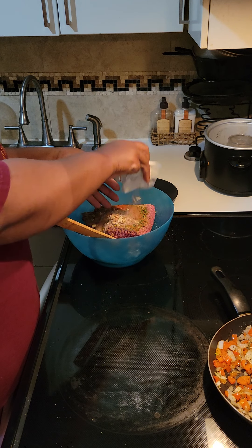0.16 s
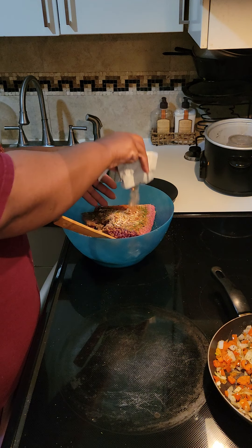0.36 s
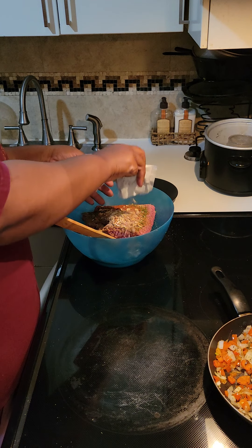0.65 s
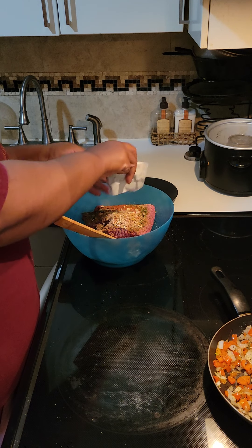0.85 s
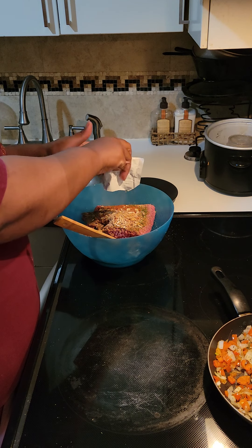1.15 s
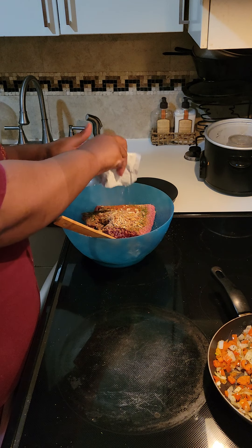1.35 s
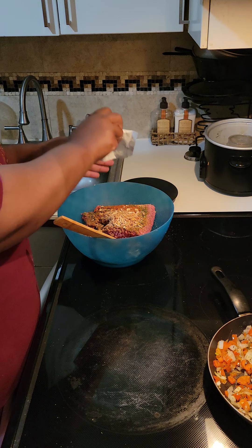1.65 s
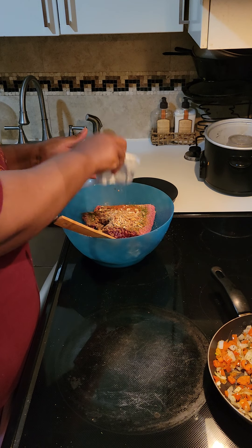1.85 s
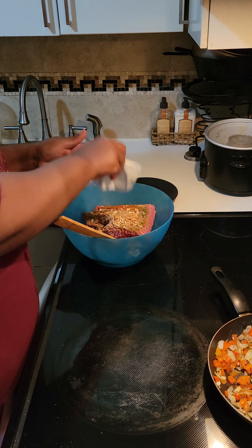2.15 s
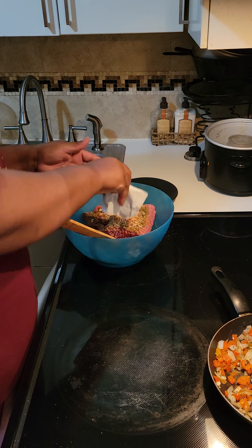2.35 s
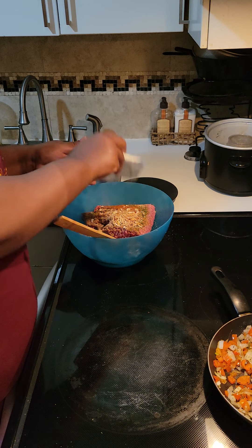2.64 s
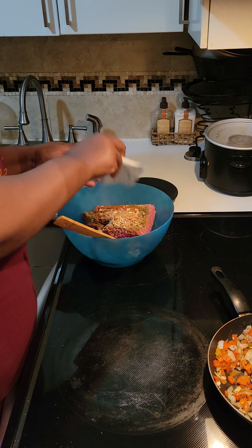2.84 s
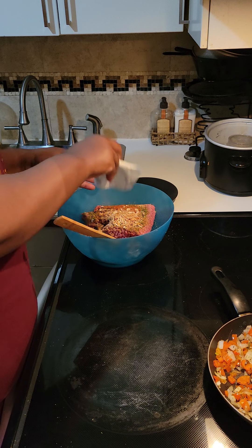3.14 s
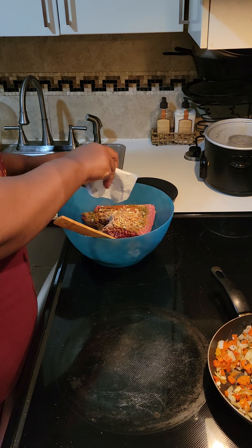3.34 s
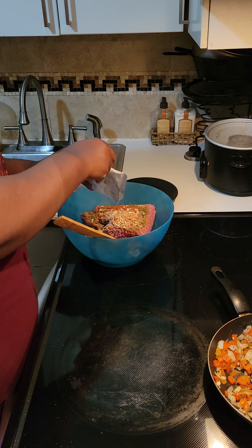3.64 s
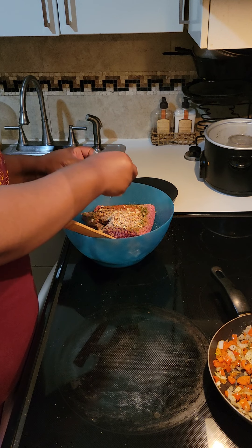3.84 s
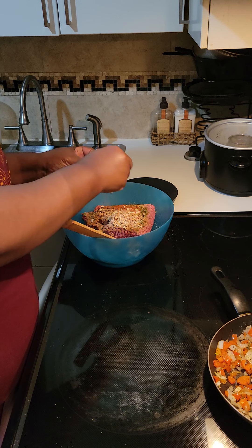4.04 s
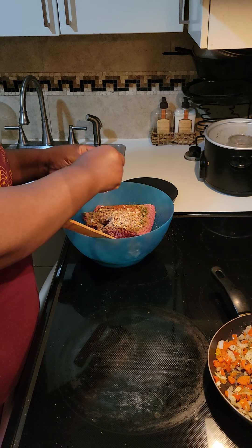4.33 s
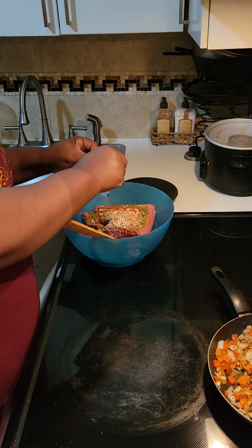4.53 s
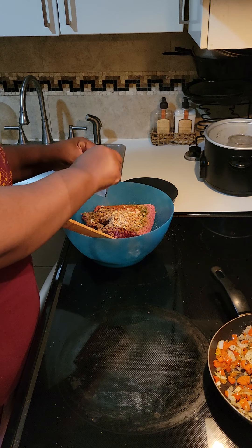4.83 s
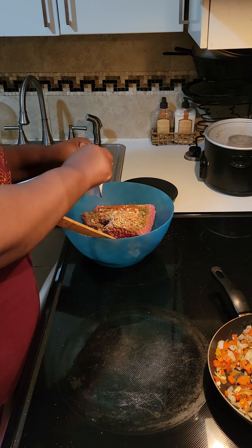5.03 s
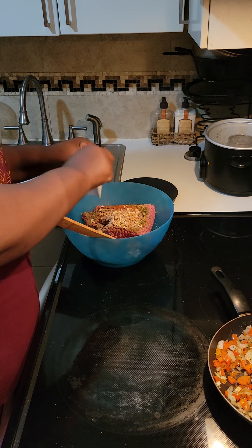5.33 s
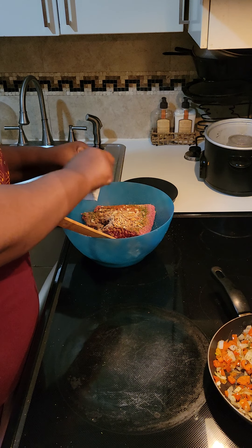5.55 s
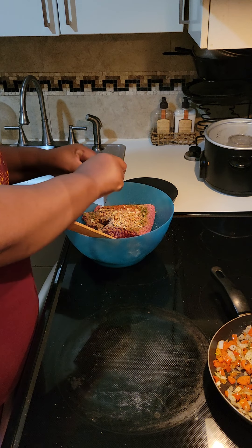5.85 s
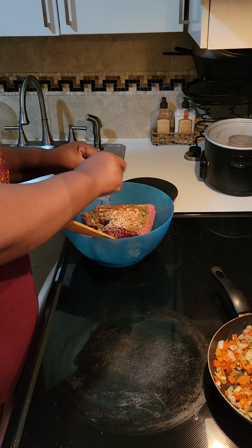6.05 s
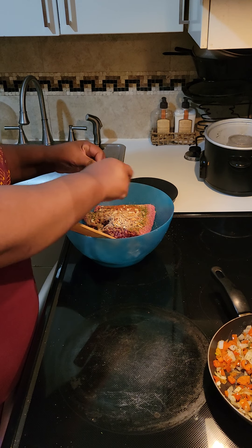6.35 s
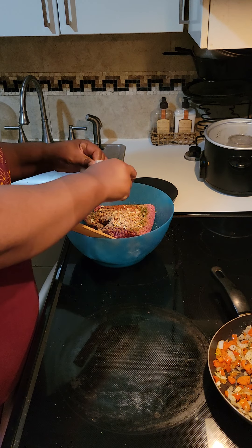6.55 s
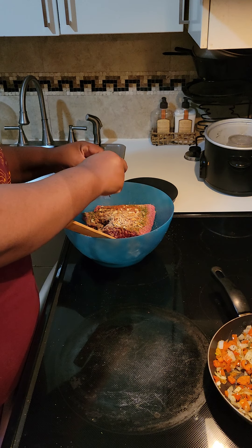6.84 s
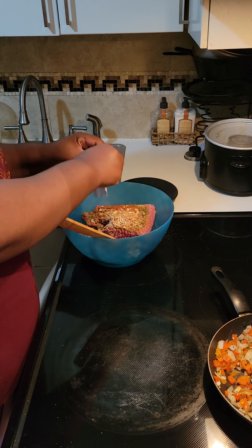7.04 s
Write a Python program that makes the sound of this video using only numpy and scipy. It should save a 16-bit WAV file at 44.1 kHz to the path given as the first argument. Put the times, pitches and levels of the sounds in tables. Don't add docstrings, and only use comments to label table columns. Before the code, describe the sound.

Close, dry paper crinkling: uneven shakes with fine grains sliding, a sparse lull, then denser snapping and crushing over a faint refrigerator hum.

```python
import sys
import numpy as np
from scipy import signal
from scipy.fft import rfft, irfft, next_fast_len
from scipy.io import wavfile

SR = 44100
rng = np.random.default_rng(int(sys.argv[2]) if len(sys.argv) > 2 else 0)


def master_out(mix):
    frames = np.transpose(np.atleast_2d(mix))
    ceiling = np.clip(frames, -1, 1)
    pcm = np.round(ceiling * 32767).astype(np.int16)
    wavfile.write(sys.argv[1], SR, pcm)


def natural_amplitude(level_db):
    exponent = np.asarray(level_db, float) / 20
    return 10 ** exponent


N = 316990
SIZE = next_fast_len(N + SR // 2)
TIME = np.arange(N) / SR


def bins(size):
    return np.maximum(np.arange(size // 2 + 1) * SR / size, 1)


HZ = bins(SIZE)


def at_hz(points, hz=HZ):
    point_hz, value = np.array(points).T
    return np.interp(np.log(hz), np.log(point_hz), value)


def in_time(rows):
    s, *columns = np.transpose(rows)
    return [np.interp(TIME, s, column) for column in columns]


def rms_one(x):
    return x / np.sqrt(np.mean(x ** 2) + 1e-20)


def drift(rate_hz):
    r = np.exp(-20 * np.pi * rate_hz / SR)
    noise = rng.standard_normal(N // 10 + 3002)
    slow = signal.lfilter([1], [1, -2 * r, r * r], noise)[3000:]
    return np.interp(np.arange(N) / 10, np.arange(len(slow)), rms_one(slow))


def resonance(x, hz, cycles):
    r = natural_amplitude(-60 * hz / cycles / SR)
    zeros = [(1 - r * r) / 2, 0, (r * r - 1) / 2]
    poles = [1, -2 * r * np.cos(2 * np.pi * hz / SR), r * r]
    return signal.lfilter(zeros, poles, x + 1e-18)


# pitch_hz, likeness (1 same, -1 opposite)
PORT_LIKENESS = [(60, .985), (120, .9), (200, .78), (330, .45), (640, -.3), (1400, -.3), (5000, -.12),
                 (15000, 0.0)]


def diffuse_pair(size):
    mid, side = rfft(rng.standard_normal((2, size)))
    alike = np.clip(at_hz(PORT_LIKENESS, bins(size)), -1, 1)
    return (np.sqrt(1 + alike) * mid + np.sqrt(1 - alike) * side * [[1], [-1]]) / np.sqrt(2)


# pitch_hz, level_db (per Hz)
AIR_COLOUR = [(20, -12), (45, -19), (68, -7), (85, -13), (110, -16), (172, -25), (300, -12.5), (420, -20.5),
              (960, -24), (1680, -25), (2100, -31.5), (3600, -25.5), (4400, -36.5), (15600, -41)]


def room_air():
    hush = irfft(diffuse_pair(SIZE) * natural_amplitude(at_hz(AIR_COLOUR)) * (HZ > 15), SIZE)[:, :N]
    return natural_amplitude(-59.0) * rms_one(hush)


# pitch_hz, start_rad
HUM_LINES = [(56.543, .27), (141.5, 0.0), (212.0, 0.0)]
HUM_LEVEL_DB = [-50.5, -78, -84]
# start_s, level_db (rms)
FAR_MOTOR = [
    (0, -106),
    (5.6, -95),
    (5.8, -67),
    (6.8, -62),
    (7.0, -90),
    (7.19, -95),
]


def refrigerator():
    apart = np.array([[.065], [-.065]])
    lines = 0
    for (hz, phase), db in zip(HUM_LINES, HUM_LEVEL_DB):
        wavering = natural_amplitude(db + 0.35 * drift(3.3))
        lines = lines + wavering * np.sin(2 * np.pi * hz * TIME + phase + apart)
    motor = natural_amplitude(in_time(FAR_MOTOR)[0]) * np.sin(2 * np.pi * 71.3 * TIME)
    return np.sqrt(2) * (lines + motor)


# start_s, level_db (peak), pitch_hz (of the push)
FINGER_PATS = [(1.076, -34, 341.5), (1.292, -37, 322), (1.296, -51, 150), (3.389, -57, 140),
               (5.301, -38, 400), (5.303, -40, 720), (5.413, -43, 700), (5.68, -46, 640),
               (5.679, -52, 91.5), (6.571, -42, 262), (7.033, -47, 93), (7.036, -50, 190), (7.04, -44, 520),
               (6.58, -41, 480), (7.169, -63, 91.5)]


def pats():
    out, after = np.zeros(N + SR), np.arange(SR // 2) / SR
    for s, db, hz in FINGER_PATS:
        cycles = after * hz
        shape = natural_amplitude(db - 1.0 - 60 * cycles / 28.0) * (1 - np.exp(-cycles / 0.17))
        start = round(s * SR)
        out[start:start + len(after)] += shape * np.sin(2 * np.pi * cycles)
    return out[:N]


# pitch_hz, t60_s
KITCHEN_DECAY = [(100, 0.16), (500, 0.17), (2000, 0.1), (6000, 0.12), (15000, 0.067)]


def kitchen(early_db, wet_db):
    size, kept = 2 ** 15, SR // 3
    after = np.arange(size) / SR
    noise, scatter = (irfft(diffuse_pair(size)) for part in range(2))
    tail = 0
    for k, (_, t60) in enumerate(KITCHEN_DECAY):
        only_this = [(hz, float(j == k)) for j, (hz, _) in enumerate(KITCHEN_DECAY)]
        dying = noise * natural_amplitude(-60 * after / t60) * np.clip(after / 0.0037, 0, 1)
        tail = tail + at_hz(only_this, bins(size)) * rfft(dying)
    tail = irfft(tail)[:, :kept]
    early = scatter[:, :kept] * natural_amplitude(-60 * after[:kept] / 0.013)
    tail, early = (x / np.sqrt(np.sum(x ** 2) / 2) for x in (tail, early))
    return rfft(natural_amplitude(early_db) * early + natural_amplitude(wet_db) * tail, SIZE)


# pitch_hz, lead_rad (left ahead)
LEFT_LEAD = [(60, -2.5), (400, -.5), (900, 3.1), (1400, 3.0), (1850, 1.44), (3000, 2.5), (4300, 2),
             (15000, 8)]


def direct(lag_s):
    return np.exp(.5j * (at_hz(LEFT_LEAD) + 2 * np.pi * HZ * lag_s) * [[1], [-1]])


# pitch_hz, level_db (per Hz)
PAPER_COLOUR = [(150, -50), (250, -14.5), (500, -7.5), (900, -8), (1250, -3.5), (1600, -4), (2050, -3),
                (3200, 0.5), (4500, -8.5), (7400, -14), (8700, -12), (10600, -15.5), (13000, -10.5),
                (15600, -17.5)]
COLOUR_BORDERS_HZ = [740, 2040, 4640, 7400]


def paper_voice(trains):
    below = [0] + [1 / (1 + (HZ / hz) ** 8) for hz in COLOUR_BORDERS_HZ] + [1]
    spectrum = 0
    for train, low, high in zip(trains, below, below[1:]):
        part = natural_amplitude(at_hz(PAPER_COLOUR)) * (high - low)
        spectrum = spectrum + rfft(train, SIZE) * part / np.sqrt(np.mean(part ** 2))
    return irfft(spectrum, SIZE)[:N]


def buckles(per_s, spread_db, clump_db, cycles):
    sizes = natural_amplitude(spread_db * np.minimum(rng.exponential(1, N), 3.0)) * rng.choice([-1, 1], N)
    clicks = sizes * (rng.random(N) < per_s * natural_amplitude(clump_db * drift(60)) / SR)
    facet = rng.integers(0, 14, N)
    facet_hz = np.geomspace(300, 16000, 14)
    return rms_one(sum(resonance(clicks * (facet == k), hz, cycles) for k, hz in enumerate(facet_hz)))


# start_s, level_db (rustle), brightness_db
STEADY_GRIP = [(0.0, -54.1, -1.0), (0.19, -59, 6.2), (0.32, -69.5, -5.5), (0.45, -65, -2.1),
               (0.91, -62.5, -3), (1.06, -71.5, 6.0), (1.22, -54, -2), (1.51, -68, -1.3),
               (1.99, -69.5, -8.5), (2.45, -64.6, -6), (3.5, -65, -1), (4.2, -63.0, 4.5), (5.3, -55, 1),
               (6.08, -52, 1.5), (6.3, -57.5, -0.3), (6.41, -69, 4.1), (6.8, -62.5, -3), (7.0, -80, 4.0)]
GRIP_COLOUR_DB = [-7, 3, 0.5, -3.5, -0.3]
GRIP_BRIGHTENING = [-0.37, -0.98, 0.24, .45, .65]
# crest_s, level_db, swell_s,
# fade_s, brightness_db
SHAKES_AND_SQUEEZES = [(0.097, -44.5, 0.17, 0.1, 4), (0.213, -48.5, 0.045, 0.03, 9),
                       (0.369, -45.5, 0.063, 0.173, -1.5), (0.507, -42, 0.025, 0.18, 2.5),
                       (0.59, -37.5, 0.13, 0.035, -2.0), (0.733, -45.9, 0.019, 0.29, 1.5),
                       (0.913, -56.5, 0.075, 0.074, -6.3), (1.088, -32.5, 0.016, 0.08, -4),
                       (1.258, -52, 0.154, 0.02, 5.8), (1.335, -44, 0.07, 0.07, -3),
                       (1.594, -56.8, 0.055, 0.046, 2), (1.719, -52, 0.039, 0.061, -1.8),
                       (1.844, -35.5, 0.08, 0.045, -2), (1.975, -56.3, 0.037, 0.049, -12),
                       (2.12, -51.9, 0.187, 0.172, 6), (2.386, -51, 0.16, 0.087, 8), (2.528, -52, 0.028, 0.052, 4),
                       (2.612, -54.4, 0.11, 0.145, 6.4), (2.862, -44.7, 0.15, 0.072, 3.7),
                       (3.06, -45.5, 0.189, 0.16, 6), (3.276, -48.5, 0.17, 0.29, -2),
                       (3.407, -37.5, 0.036, 0.071, -5.5), (3.687, -49, 0.17, 0.068, -3.1),
                       (3.871, -53.5, 0.15, 0.26, 3),
                       (4.009, -50, 0.228, 0.027, -3), (4.095, -55.5, 0.027, 0.16, -2),
                (4.251, -49, 0.12, 0.21, -1.9), (4.407, -39.5, 0.013, 0.093, -1.5),
                (4.564, -45.0, 0.027, 0.075, 5.9), (4.625, -49.3, 0.22, 0.084, -8.6),
                (4.768, -46, 0.048, 0.25, -2.5), (4.893, -36.9, 0.05, 0.11, 4.5),
                (5.097, -37.1, 0.09, 0.15, 13.5), (5.28, -46, 0.1, 0.04, 4), (5.314, -29.5, 0.02, 0.08, 1),
                (5.415, -34.5, 0.013, 0.06, -4), (5.534, -44.2, 0.019, 0.086, 3.9),
                (5.615, -39.5, 0.12, 0.323, 3.7), (5.834, -41, 0.045, 0.082, 7),
                (5.879, -44, 0.016, 0.029, -1), (5.979, -40.5, 0.12, 0.13, -1),
                (6.145, -41.5, 0.142, 0.11, -1), (6.33, -46, 0.012, 0.05, 3),
                (6.498, -44.8, 0.12, 0.067, 13), (6.587, -42.5, 0.14, 0.05, -10),
                (6.75, -53, 0.071, 0.17, 15), (7.04, -38.5, 0.009, 0.059, -0.5),
                (7.184, -42, 0.041, 0.1, 5)]
CREST_COLOUR_DB = [-17, -4, 0, -8.5, -6]
CREST_BRIGHTENING = [-0.76, -0.88, 0.067, 0.25, .45]


def handling():
    level_db, bright_db = in_time(STEADY_GRIP)
    grip_db = level_db + np.array(GRIP_COLOUR_DB)[:, None] + np.outer(GRIP_BRIGHTENING, bright_db)
    power = natural_amplitude(2 * grip_db)
    for s, db, swell, fade, bright_db in SHAKES_AND_SQUEEZES:
        swell, fade = max(swell, .005), max(fade, .005)
        near = slice(max(round((s - 2 * swell) * SR), 0), round((s + 2 * fade) * SR))
        away = np.maximum((s - TIME[near]) / swell, (TIME[near] - s) / fade)
        shares_db = np.array(CREST_COLOUR_DB) + bright_db * np.array(CREST_BRIGHTENING)
        crest_db = db - 20 * away
        power[:, near] += natural_amplitude(2 * shares_db[:, None]) * natural_amplitude(2 * crest_db)
    return np.sqrt(power)


def rustle():
    paper = buckles(per_s=4000, spread_db=3.3, clump_db=4.2, cycles=5.1)
    grains = rms_one(rng.standard_normal(N) * natural_amplitude(1.2 * drift(150)))
    bright, airy = 0.95 * grains + 0.8 * paper, 1.1 * grains + 0.6 * paper
    return natural_amplitude(-3.5) * handling() * [paper, paper, paper, bright, airy]


# start_s, level_db (peak), pitch_hz
STIFF_FACETS = [(0.1053, -37, 3100), (0.3627, -39, 2580), (0.3627, -43, 3790), (0.3831, -40, 2760),
                (0.4405, -44, 3880), (0.441, -39, 2840), (0.442, -30, 1550), (0.4465, -33, 1460),
                (0.5019, -36, 1810), (0.5153, -34, 1720), (0.5682, -30, 2760), (0.5792, -33, 1810),
                (0.5877, -37, 4050), (0.5926, -34, 2580), (0.5931, -31, 1550), (0.6001, -32, 1030),
                (0.7328, -42, 3530), (0.7398, -35, 1720), (0.7478, -41, 1640), (0.8032, -41, 2930),
                (0.8166, -35, 1550), (1.0785, -37, 3450), (1.0795, -34, 1460), (1.0845, -35, 2840),
                (1.0845, -32, 3880), (1.0865, -33, 1720), (1.09, -35, 3700), (1.093, -33, 3010),
                (1.0955, -31, 1120), (1.105, -31, 1210), (1.2282, -40, 1460), (1.2896, -39, 3270),
                (1.2926, -35, 2580), (1.2951, -35, 3530), (1.2965, -33, 950), (1.331, -38, 3960),
                (1.3325, -35, 3190), (1.337, -37, 1030), (1.3414, -37, 1210), (1.8453, -28, 3450),
                (1.8473, -33, 1720), (1.8528, -33, 3360), (1.8568, -33, 1720), (2.1117, -37, 1720),
                (2.1202, -35, 1720), (2.6126, -39, 1550), (2.6195, -44, 3100), (2.62, -41, 1210),
                (3.0311, -41, 3450), (3.0411, -37, 3620), (3.0416, -40, 2500), (3.1843, -47, 3450),
                (3.2546, -40, 2240), (3.31, -45, 3360), (3.3913, -37, 3360), (3.3983, -39, 4050),
                (3.3983, -36, 3190), (3.4068, -35, 1460), (3.5385, -48, 3530),
                (4.2568, -41, 3100), (4.619, -39, 2580), (4.632, -38, 3360), (4.7562, -40, 2150),
                   (4.7582, -37, 2930), (4.7612, -38, 2330), (4.7622, -40, 1290), (4.8235, -40, 3100),
                   (4.8874, -36, 3190), (4.9228, -36, 2930), (5.044, -43, 1030), (5.0989, -36, 1720),
                   (5.0994, -29, 2760), (5.1019, -30, 3360), (5.1094, -33, 2760), (5.1927, -35, 2760),
                   (5.1967, -43, 1460), (5.272, -36, 3190), (5.276, -37, 3360), (5.283, -35, 2240),
                   (5.3, -30, 1550), (5.3014, -23, 2760), (5.3054, -27, 1380), (5.4122, -26, 3270),
                   (5.4127, -39, 4220), (5.4132, -27, 2580), (5.4187, -26, 1460), (5.4406, -33, 1550),
                   (5.4526, -34, 1380), (5.5299, -35, 2930), (5.6152, -34, 3360), (5.6207, -33, 3100),
                   (5.6581, -36, 1810), (5.6746, -34, 1810), (5.6756, -34, 2930), (5.8801, -30, 3010),
                   (5.8816, -35, 1290), (5.9146, -40, 1210), (5.959, -36, 2150), (5.9754, -35, 1550),
                   (6.0183, -39, 3270), (6.137, -37, 2240), (6.1914, -41, 3270), (6.1974, -41, 1550),
                   (6.2767, -42, 2330), (6.2972, -39, 1810), (6.3241, -45, 4570), (6.3281, -31, 3530),
                   (6.4997, -38, 3190), (6.5746, -34, 3270), (6.579, -32, 3530), (6.582, -38, 2240),
                   (6.5825, -36, 1030), (7.0345, -45, 3450), (7.0405, -40, 3530), (7.044, -38, 2760),
                   (7.045, -41, 1810), (7.1822, -36, 3270), (7.1822, -40, 2500)]


def pops():
    out, after = np.zeros(N + SR), np.arange(SR // 25) / SR
    for s, db, hz in STIFF_FACETS:
        cycles = after * hz
        shape = natural_amplitude(db + 3.5 - 60 * cycles / 20.0) * (1 - np.exp(-cycles / 0.8))
        start = round(s * SR)
        out[start:start + len(after)] += 2 * shape * np.sin(2 * np.pi * cycles)
    return out[:N]


# start_s, level_db (peak), pitch_hz (ring),
# bright_db (share)
CREASES = [(0.078, -35, 1600, -17), (0.1005, -30, 2920, -7), (0.1987, -38.5, 2950, -4),
           (0.3421, -42, 1590, -8), (0.3632, -32, 2700, -15), (0.3825, -33.5, 1700, -8),
           (0.4355, -36, 1500, -15), (0.4415, -29, 1480, -20), (0.516, -32, 1650, -8),
           (0.5, -28, 1700, -7.5), (0.5686, -28, 2740, -9), (0.578, -29, 1700, -11),
           (0.5922, -23.5, 1540, -14), (0.723, -38, 1700, -19), (0.733, -34, 2550, -5),
           (0.7398, -32, 1700, -8), (0.8012, -34, 1810, -5), (0.8158, -29, 1550, -15),
           (0.9184, -43, 2500, -8), (0.9918, -44, 2720, -6), (0.9685, -42, 1680, -4),
           (1.0728, -28, 1650, -10), (1.0826, -28, 1970, -10), (1.1727, -36, 2430, -16),
           (1.2093, -34, 1440, -13), (1.2908, -25, 2600, -9), (1.295, -27, 1500, -11),
           (1.331, -26, 1380, -8), (1.411, -43.5, 1340, -4), (1.548, -48, 1740, -4),
           (1.7148, -36.5, 1360, -16), (1.7818, -39, 1700, -12), (1.82, -40, 1450, -11.5),
           (1.8454, -23, 3400, -10.5), (1.8474, -27, 1720, -12), (1.965, -44, 1250, -15),
           (2.0522, -48, 1810, 4), (2.1116, -29.5, 1700, -24), (2.3083, -40, 1480, -12),
           (2.355, -40, 1540, -12),
           (2.6005, -36, 1410, -11), (2.6116, -32, 1670, -13), (2.8322, -39, 2260, -4),
                   (3.04, -31.5, 3690, -8), (3.0592, -39, 1650, 3), (3.236, -44, 3580, -14),
                   (3.2544, -30.5, 2250, -9.5), (3.276, -35.5, 1450, -11), (3.3921, -25.5, 2560, -13.5),
                   (3.8763, -37, 3040, -8), (3.9569, -37.5, 1620, -11), (3.9893, -37, 1610, -17),
                   (4.2268, -41, 3170, -20), (4.2566, -36.5, 3000, 0), (4.4024, -34, 2580, -19),
                   (4.5483, -38, 3730, -3), (4.563, -37.5, 1740, -1), (4.6173, -35, 2650, -27),
                   (4.6266, -27, 2550, -9), (4.757, -27, 2260, -22), (4.7942, -33, 2170, -1.5),
                   (4.884, -27.5, 3000, -5.5), (4.9511, -41, 3100, -14), (4.9901, -39, 2900, 1),
                   (5.011, -38, 2990, -8), (5.038, -31.5, 3520, -1.5), (5.0714, -32, 3630, 2.5),
                   (5.0994, -23.5, 2720, -3.5), (5.162, -36, 2700, 3), (5.193, -29, 2740, -32),
           (5.271, -28.5, 3280, -1), (5.3006, -19, 2700, -18), (5.305, -24, 1400, -15),
                    (5.4124, -21, 2900, -14.5), (5.4185, -25, 1450, -16), (5.529, -32, 3370, -4),
                    (5.5947, -34, 2300, -3), (5.6165, -23.5, 3230, -17), (5.5675, -37, 3140, -12),
                    (5.658, -28, 1860, -14), (5.674, -26, 1870, -3), (5.7994, -42, 2300, -3),
                    (5.8288, -40, 3110, -7), (5.88, -21, 3040, -13), (5.959, -30, 1900, -11),
                    (6.0193, -35, 3190, -12), (6.1352, -34.5, 1650, -3.5), (6.2763, -32, 2190, -18),
                    (6.296, -34.5, 1790, -21), (6.325, -25, 3460, -4), (6.4407, -34, 2100, 0.5),
                    (6.4868, -38, 1720, 5.5), (6.4984, -30, 3150, -3), (6.5568, -30.5, 2140, -10),
                    (6.579, -26.5, 3300, -13), (6.739, -37, 3700, -2.5), (6.9167, -46, 2720, -7),
                    (7.0025, -46, 3100, -7), (7.041, -31, 2820, -14), (7.1516, -42, 3540, -4.5),
                    (7.1693, -34, 2530, -13), (7.1824, -29, 3180, -11)]


def snaps():
    trains, (ticks, rings) = np.zeros((5, N + SR)), np.zeros((2, N + SR))
    shower = np.append(buckles(per_s=6000, spread_db=2.5, clump_db=3.5, cycles=4.7), np.zeros(SR))
    after = np.arange(SR // 5) / SR
    for s, db, hz, bright_db in CREASES:
        span = slice(round(s * SR), round(s * SR) + len(after))
        sharp_db = db + 30
        dull_db = -21 - 0.1 * sharp_db
        t60 = np.clip(.105 - .0015 * sharp_db, .02, .4)
        burst = shower[span] * natural_amplitude(db - 11 - 60 * after / t60)
        shares_db = [dull_db + 5.5, -9.0, -7.0, 0.85 * bright_db + 0.7, 1.15 * bright_db + 3.5]
        trains[:, span] += natural_amplitude(shares_db)[:, None] * burst
        swell = 1 - np.exp(-after * hz / 0.78)
        ticks[span] += natural_amplitude(db - 2.5 - 60 * after * hz / 19.3) * swell * np.sin(2 * np.pi * hz * after)
        rings[span] += natural_amplitude(8.0) * resonance(burst, hz, cycles=26.0)
    return trains[:, :N], ticks[:N], rings[:N]


# pitch_hz, left_over_right_db
LEFT_OVER_RIGHT = [(300, -5), (700, -2.5), (1290, -1.5), (2380, -2.5), (4400, 0), (8500, 3.5), (12000, 0.5),
                   (15000, 0.5)]


def packet():
    showers, ticks, rings = snaps()
    paper = paper_voice(rustle() + showers) + rings
    ticks = ticks + pops()
    heard = natural_amplitude(-2.5) * rfft(ticks, SIZE) * direct(lag_s=0)
    shares = natural_amplitude(10 * np.array([drift(30) for place in range(7)]))
    shares = shares / np.sqrt(np.sum(shares ** 2, axis=0))
    for share in shares:
        lag_s = rng.normal(0, 1.3e-4)
        straight = rfft(share * paper, SIZE)
        echoing = rfft(share * (paper + natural_amplitude(-3.0) * ticks), SIZE)
        heard = heard + natural_amplitude(-6.5) * straight * direct(lag_s)
        heard = heard + echoing * kitchen(early_db=-6, wet_db=-4.5)
    heard = heard * natural_amplitude(at_hz(LEFT_OVER_RIGHT) * [[.5], [-.5]])
    return irfft(heard, SIZE)[:, :N]


def scene():
    return packet() + pats() + room_air() + refrigerator()


def band_limit(x):
    return signal.sosfilt(signal.butter(12, 16650, fs=SR, output="sos"), x)


def record(dry):
    top_cut = irfft(rfft(dry, SIZE) * (HZ < 15850), SIZE)[:, :N]
    return band_limit(top_cut)


dry = scene()
out = record(dry)
master_out(out)
```